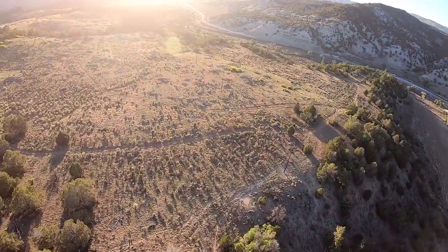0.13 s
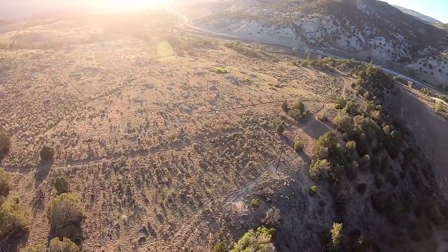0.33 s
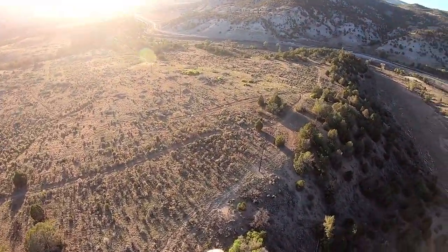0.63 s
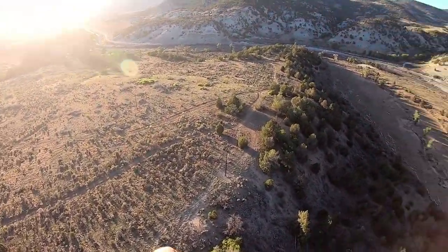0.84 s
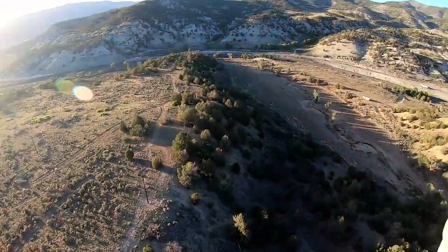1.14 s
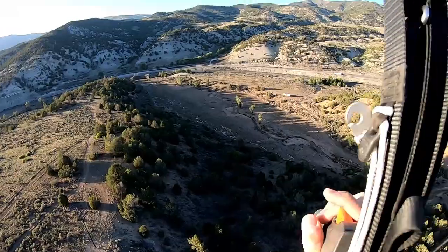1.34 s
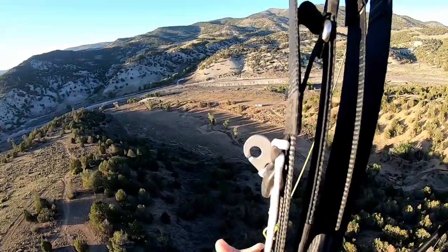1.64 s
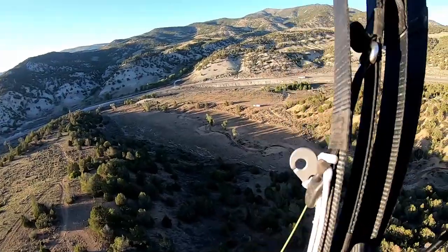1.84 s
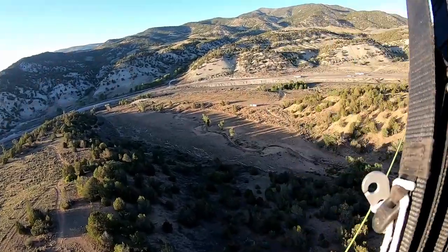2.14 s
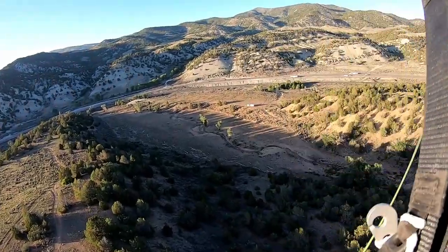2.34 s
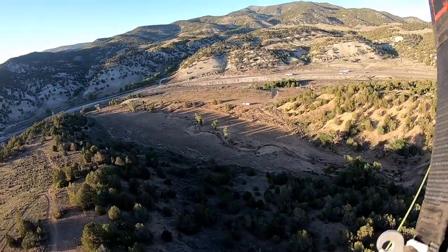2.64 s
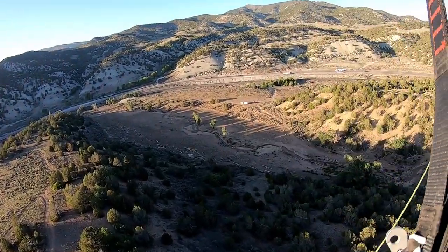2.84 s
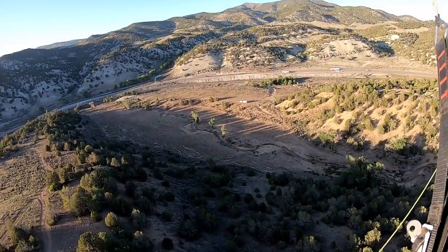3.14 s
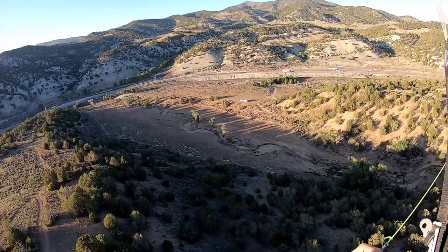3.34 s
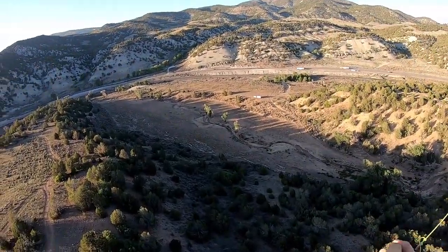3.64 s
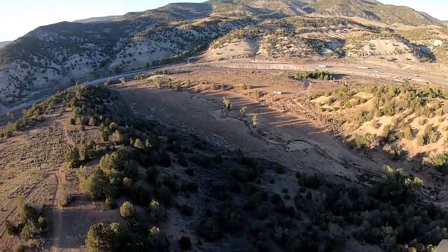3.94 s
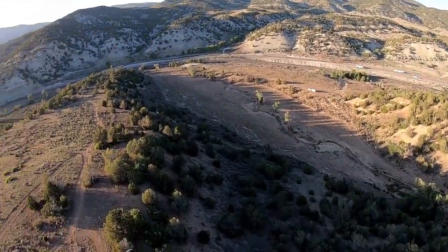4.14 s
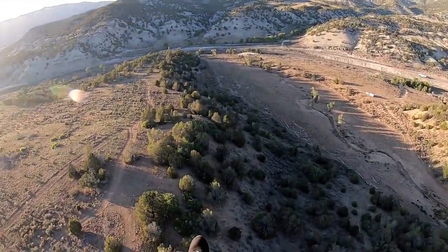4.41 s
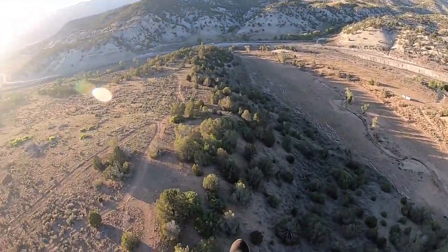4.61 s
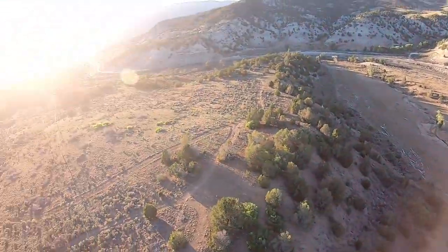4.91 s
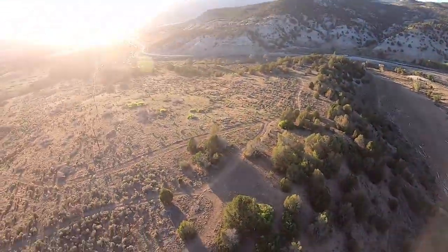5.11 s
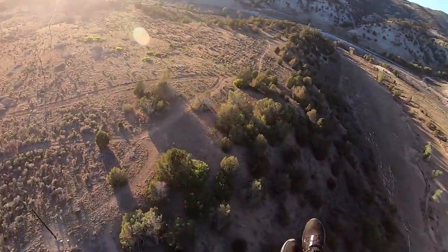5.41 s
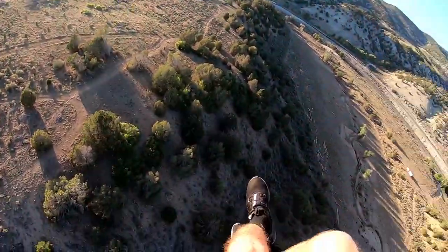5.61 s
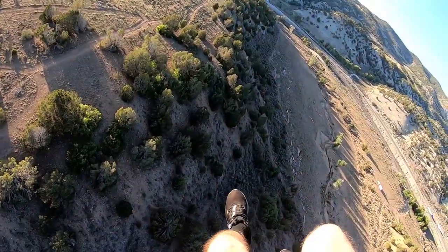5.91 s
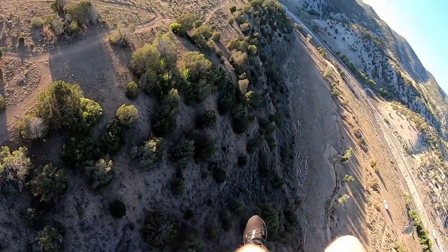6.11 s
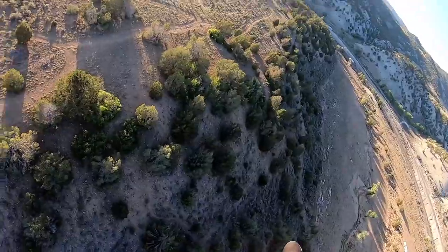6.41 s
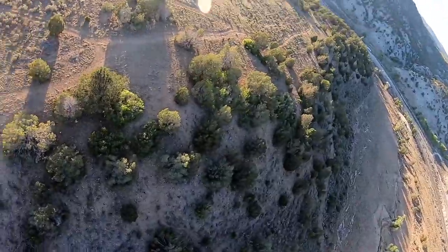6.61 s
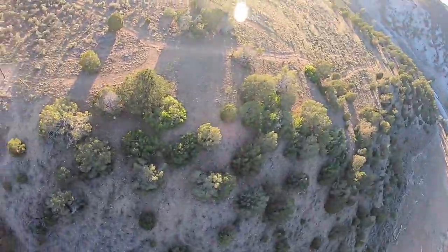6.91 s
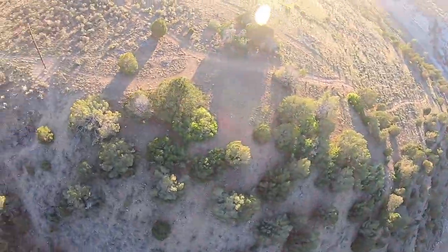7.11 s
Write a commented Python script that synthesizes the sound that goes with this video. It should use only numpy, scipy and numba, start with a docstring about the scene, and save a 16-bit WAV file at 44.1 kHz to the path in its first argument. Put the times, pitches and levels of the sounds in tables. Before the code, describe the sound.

A small two-stroke propeller engine drops from high revs to a popping idle, climbs, sinks and rises again amid rushing wind.

```python
"""A belt-driven two-blade propeller and its backpack two-stroke, heard from a helmet camera in flight.
High revs fall to an idle in the first three seconds, with stray pops, and harness ticks until the revs recover.
The note climbs, sinks again before six and a half seconds, then rises as a faint whistle swells and fades.
Throughout, harmonic exhaust and blade tones beat, filtered noise makes prop wash and wind, and noise bursts
ring the loose cage; the rush follows the revs while its treble comes and goes."""
import sys
import numpy as np
from scipy import signal
from scipy.fft import rfft, irfft
from scipy.io import wavfile
from scipy.ndimage import uniform_filter1d
from numba import njit

SR = 44100
rng = np.random.default_rng(int(sys.argv[2]) if len(sys.argv) > 2 else 0)


def pcm_store(signal):
    """Save signal as 16-bit PCM."""
    levels = np.round(np.clip(np.atleast_2d(signal), -1, 1) * 32767)
    wavfile.write(sys.argv[1], SR, levels.astype(np.int16).T)


N = 319857


def undb(db):
    """Logarithmic level: decibels to amplitude gain."""
    return 10 ** (np.asarray(db) / 20)


def curves(table):
    """Linear interpolation: each column of a table, one value a sample."""
    s, *columns = np.transpose(table)
    return [np.interp(np.arange(N) / SR, s, c) for c in columns]


def unit(x):
    """Normalisation to an rms of 1."""
    return x / np.sqrt(np.mean(x ** 2))


@njit
def svf(x, hz, width):
    """Resonance: a state-variable band-pass with gain 1 at the centre."""
    y, band, low = np.empty(len(x)), 0., 0.
    g, k = np.tan(np.pi * hz / SR), width / hz
    for i in range(len(x)):
        v = (band + g * (x[i] - low)) / (1 + g * (g + k))
        band, low, y[i] = 2 * v - band, low + 2 * g * v, k * v
    return y


def ring(x, modes):
    """Modal superposition: a sum of resonances with alternating sign."""
    out = 0
    for i, (hz, width, db) in enumerate(modes):
        out = out + (-1) ** i * undb(db) * svf(x, 1. * hz, 1. * width)
    return out


def dull(x, hz):
    """High-frequency attenuation: a steep low-pass."""
    return signal.sosfilt(signal.butter(4, hz, fs=SR, output="sos"), x)


def walk(rate):
    """Slow random fluctuation: levels held 1 / rate s, slewed twice, spread 1."""
    k = int(SR / rate)
    held = np.repeat(rng.standard_normal(N // k + 1), k)
    slewed = uniform_filter1d(uniform_filter1d(held, k), k)
    return unit(slewed[:N])


def strikes(table):
    """Impulsive excitation: one impulse for each (s, dB) row."""
    s, db = np.transpose(table)
    x = np.zeros(N)
    x[(s * SR).astype(int)] = undb(db)
    return x


def burst(x, t60_s):
    """Exponential decay: each impulse starts a short fading noise."""
    decay = np.exp(-np.log(1000) * np.arange(int(t60_s * SR)) / (t60_s * SR))
    return np.convolve(x, decay)[:N] * rng.standard_normal(N)


def whole_cycles(phase):
    """Phase counting: 1 at each sample that completes a cycle, 0 elsewhere."""
    return np.diff(np.floor(phase), prepend=0)


def pulling(hz):
    """Rate of change of revs: how hard they climb (up to 1) or fall (down to -1)."""
    hz_per_s = uniform_filter1d(np.gradient(hz) * SR, SR // 4)
    return np.tanh(hz_per_s / 38)


# Levels that follow the revs: firing rate f/Hz, blade overtones below the ninth level/dB, from the ninth level/dB,
# rush around 1.2 kHz level/dB, around 4 kHz level/dB, around 7.5 kHz level/dB
LEVELS_BY_REVS = [(44.5, -31, -48.5, -33.5, -41.5, -58), (52.2, -35.5, -33, -32, -39.5, -58),
                  (63.39, -35.5, -36, -25.5, -36.5, -54.5), (85.6, -30.5, -29, -20.5, -32, -49),
                  (94.6, -38.5, -40, -17, -30, -45.5), (106.8, -31.5, -19, -18.5, -31, -54)]
PULL_DB = 1.5  # louder while the revs climb, softer while they fall


def by_revs(hz):
    """Speed-dependent source strength: levels against log firing rate, raised while the engine pulls."""
    rate, *columns = np.transpose(LEVELS_BY_REVS)
    return [np.interp(np.log(hz), np.log(rate), c) + PULL_DB * pulling(hz) for c in columns]


# Eddies at the microphone: t/s, rumble level/dB, buffet level/dB
WIND_LEVELS = [(0.0, -29, -22.5), (0.6, -34, -21.5), (0.95, -37, -15.5), (1.25, -33, -19.5),
               (1.6, -33, -17.5), (2.2, -23, -19), (2.6, -24, -21.5), (2.9, -27, -21.5), (3.3, -30, -23.5),
               (3.75, -28, -21), (4.14, -18, -21.5), (4.7, -27, -23), (5.0, -28, -22.5),
               (5.25, -21.5, -20.5), (5.7, -24, -21.5), (6.1, -19.5, -20), (6.5, -22, -19),
               (6.9, -23, -20.5), (7.25, -20, -19.5)]


def wind():
    """Turbulent pressure: eddies on the microphone port give a deep rumble and a lumpy buffet above it."""
    rumble_db, buffet_db = curves(WIND_LEVELS)
    rumble = svf(svf(svf(rng.standard_normal(N), 60., 77.0), 60., 81.0), 60., 100.0)
    buffet = dull(svf(svf(rng.standard_normal(N), 157.5, 97.0), 186.0, 600.0), 830.0)
    rumble = unit(rumble) * undb(rumble_db + .8 * walk(2.6))
    buffet = unit(buffet) * undb(buffet_db + .4 * walk(17))
    return rumble + buffet


WHISTLE_S, WHISTLE_HALF_S = 6.81, 0.26  # centre, and time from there to 1/e
WHISTLE_HZ, WHISTLE_WIDTH_HZ, WHISTLE_DB = 2046., 111.6, -44


def whistle():
    """Narrow-band flow noise: a breathy band swells in the airflow and fades."""
    swell = np.exp(-((np.arange(N) / SR - WHISTLE_S) / WHISTLE_HALF_S) ** 2)
    breath = unit(svf(rng.standard_normal(N), WHISTLE_HZ, WHISTLE_WIDTH_HZ))
    return undb(WHISTLE_DB) * swell * breath


# Rush relative to the law of the revs: t/s, around 1.2 kHz level/dB, around 4 kHz level/dB
RUSH_OFFSETS = [(0, -1.5, 1.5), (.6, -1.5, -0.5), (1.1, 1.2, 2), (2.0, 2.7, -1.5), (2.8, -2.5, -5.5),
                (3.1, -1, -1.5), (3.7, 2, 3), (4.35, 0.5, 2.5), (4.75, -1.5, -1.5), (5.05, 0, 1),
                (5.55, -3, 1), (5.8, 1, -1.5), (6.1, 3, -2.5), (6.5, 6, -4), (6.9, 1.5, -1.2),
                (7.25, -0.5, 4.5)]
# Treble of the rush: t/s, around 7.5 kHz level/dB relative to the law of the revs, around 12 kHz level/dB
TREBLE_LEVELS = [(0, 2, -60), (.3, -0.5, -59.5), (.8, -3, -66), (1.0, -3, -70), (1.52, -1, -56.5),
                 (1.9, 2, -60), (2.2, 1, -71), (2.8, 1, -80), (3.2, 3, -70), (3.55, 6, -59),
                 (3.95, -1, -61), (4.45, 1.5, -66), (4.8, -3.5, -66), (5.1, 3, -65), (5.6, -1.5, -71),
                 (6.0, -2.5, -66), (6.5, 2, -71), (6.85, 3, -62), (7.25, -1, -61)]
# Relative spectral density of the rush: f/Hz, level/dB
RUSH_SPECTRUM = [(200, -28), (330, -21.5), (480, -8), (750, -6), (1160, -9), (1700, -12), (2330, -16.5),
                 (3370, -21.5), (4900, -30), (5700, -35), (6400, -40), (7400, -41), (8500, -47),
                 (10800, -47.5), (13000, -62.5), (15000, -71)]
# Reference levels of that spectrum around 1.2, 4, 7.5 and 12 kHz: level/dB
RUSH_REFERENCE_DB = (-24, -36, -53, -62)
# Brief swells of the rush: t/s, level/dB at the peak, time from there to 1/e of the dB rise t/s
RUSH_SWELLS = [(0.87, 4.5, 0.028), (4.538, 1.5, 0.019), (5.533, 3.5, 0.053)]


def rush(crank, blade, low_revs, revs_db):
    """Amplitude-modulated broadband noise: prop wash chopped as each blade passes three struts on its way."""
    body_db, bright_db = curves(RUSH_OFFSETS)
    treble_db, top_db = curves(TREBLE_LEVELS)
    levels_db = [revs_db[0] + body_db, revs_db[1] + bright_db, revs_db[2] + treble_db, top_db]
    gust = walk(17)
    # both blade swells come and go with the gusts; at lower revs each firing adds a puff of gas
    struts, passes, puffs = (undb(3 * walk(2.5)) for _ in range(3))
    chop = 1 + .14 * struts * np.cos(6 * np.pi * blade)
    chop += .09 * passes * np.cos(2 * np.pi * blade)
    chop += .13 * puffs * low_revs * np.cos(2 * np.pi * crank)
    f = np.fft.rfftfreq(N, 1 / SR) + 1
    colour_hz, colour_db = np.transpose(RUSH_SPECTRUM)
    colour = undb(np.interp(np.log(f), np.log(colour_hz), colour_db))
    noise = rfft(rng.standard_normal(N) * chop) * colour
    middle = irfft(noise * (f > 500) * (f < 2500), N)
    noise = noise * undb(RUSH_REFERENCE_DB[0]) / np.std(middle)
    swell_db = sum(db * np.exp(-((np.arange(N) / SR - s) / half_s) ** 2) for s, db, half_s in RUSH_SWELLS)
    anchors = np.log([1500, 4000, 7500, 12000])
    out = 0
    # overlapping third-octave bands, each levelled between its nearest anchors
    for hz in 1500 * 2 ** (np.arange(-9, 12) / 3):
        band = irfft(noise * np.clip(1 - abs(3 * np.log2(f / hz)), 0, 1), N)
        share = [np.interp(np.log(hz), anchors, row) for row in np.eye(len(anchors))]
        band_db = sum(s * (db - usual) for s, db, usual in zip(share, levels_db, RUSH_REFERENCE_DB))
        out = out + band * undb(band_db + swell_db + 0.14 * gust + 1.0 * walk(20))
    return out


# Rattle of the cage: t/s, level/dB
RATTLE_LEVELS = [(0, -69), (1.1, -65), (1.55, -61), (2.0, -60), (3.2, -66), (3.5, -59), (3.9, -64),
                 (4.3, -69), (6.5, -71), (6.9, -68), (7.25, -68)]
# Loose parts of the cage, excited twice in series: f/Hz, width f/Hz, relative level/dB for each pass
CAGE_MODES = [(7500, 1700, 0.5), (10300, 1200, -1), (12200, 1200, -4.5)]
RATTLE_T60_S, RATTLE_SCATTER_DB = .012, 4
SHAKE_DB = 4.5  # the firing that meets the heavy side of the propeller shakes harder


def rattle(crank, blade):
    """Forced vibration with imbalance: each firing jolts the cage into a short bright rattle."""
    fired = whole_cycles(crank) > 0
    scatter_db = RATTLE_SCATTER_DB * rng.standard_normal(fired.sum())
    jolts = np.zeros(N)
    jolts[fired] = undb(scatter_db + SHAKE_DB * np.cos(np.pi * blade[fired]))
    shaken = burst(jolts, RATTLE_T60_S)
    return undb(curves(RATTLE_LEVELS)[0]) * unit(ring(ring(shaken, CAGE_MODES), CAGE_MODES))


# Separate harness ticks: t/s, relative strike level/dB
TICK_STRIKES = [(1.1724, -30), (1.4394, -32), (1.4904, -27), (1.5877, -34), (1.686, -38), (1.7823, -36),
                (1.8536, -36), (1.916, -29), (2.0098, -31), (2.0906, -32), (2.1345, -32), (2.1776, -25),
                (2.2184, -30), (2.2412, -27), (2.3026, -31), (2.3241, -34), (2.3864, -27.5), (2.4268, -35),
                (2.8124, -39), (2.9631, -28), (3.0101, -31), (3.0774, -30), (3.1217, -38), (3.1577, -33),
                (3.205, -33), (3.245, -33), (3.3719, -34)]
# Resonances of buckles and rings: f/Hz, width f/Hz, relative level/dB
BUCKLE_MODES = [(2400, 1200, 5.5), (3600, 1300, 11), (5400, 720, 4.5), (7100, 880, -2.5),
                (10380, 1300, -11)]
SLACK_START_S, SLACK_END_S, SLACK_FADE_S = 1.15, 3.36, 0.4  # each fade is centred on its time
TAUT_DB, SLACK_DB = -58, -43  # chatter that drives the buckles


def ticks(blade):
    """Impact excitation of metal modes: harness ticks, and chatter with each blade pass on slack straps."""
    passes = whole_cycles(blade) > 0
    chatter = np.zeros(N)
    chatter[passes] = undb(2.5 * rng.standard_normal(passes.sum()))
    t = np.arange(N) / SR
    inside_s = np.minimum(t - SLACK_START_S, SLACK_END_S - t)
    slack = np.clip(inside_s / SLACK_FADE_S + .5, 0, 1)
    struck = undb(-1.0) * burst(strikes(TICK_STRIKES), 0.022)
    chattering = undb(TAUT_DB + (SLACK_DB - TAUT_DB) * slack) * unit(burst(chatter, 0.23))
    return dull(svf(ring(struck + chattering, BUCKLE_MODES), 4700.0, 9000.), 12000.)


# Stray firings: t/s, relative thump level/dB, crack level/dB and snap level/dB over the thump,
# delay of the crack and snap after the thump t/s
POP_STRIKES = [(1.652, -26, 5, -6, 0.015), (2.208, -28, 6, -6, -0.0013), (2.312, -10.5, -12, -22, -0.0037),
               (2.4836, -9, 1, -5, -0.0017), (2.5471, -12, 2.5, 3, 0.0022), (2.586, -30, 5, -6, .001),
               (2.608, -23, 2, -8, 0.0062), (2.6336, -10.5, 1.5, -13, -0.00017),
               (2.697, -18.5, -3, -16, .002), (2.737, -18.5, -2, -10, -0.0052)]


def pops():
    """Impulse response of the pipe: stray firings off throttle thump, and crack with a bright snap."""
    s, thump_db, crack_db, snap_db, lag_s = np.transpose(POP_STRIKES)
    thump = strikes(np.c_[s, thump_db])
    thump = dull(svf(svf(thump, 184.0, 175.0), 360.0, 680.0), 1100.0)
    crack, snap = (strikes(np.c_[s + lag_s, thump_db + db]) for db in (crack_db, snap_db))
    # each impulse carries a faint noisy tail
    crack, snap = (x + undb(-18) * burst(x, 0.015) for x in (crack, snap))
    crack = svf(svf(crack, 770.0, 850.0), 840.0, 1300.0)
    snap = svf(svf(snap, 1500.0, 1600.), 2000., 2500.)
    return dull(undb(27.5) * crack + undb(14) * snap - undb(45.0) * thump, 3000)


# Overtones of the blade passes: overtone number, relative level/dB
BLADE_OVERTONES = [(1, 1), (2, -4.5), (4, 3), (5, -12.5), (6, 6.5), (7, -0.5), (8, -3), (9, -3), (10, -2.5),
                   (12, -5.5), (13, -1), (15, -12.5), (16, -15.5)]
COAST_DB = 6  # blade overtones up to the fourth swell while the revs fall


def propeller(blade, low_db, high_db, coast):
    """Harmonics of the blade-pass frequency, each wavering in the gusty inflow."""
    out = 0
    for k, db in BLADE_OVERTONES:
        level_db = db + (low_db if k < 9 else high_db) + COAST_DB * coast * (k < 5) + 1.3 * walk(7)
        phase = k * 2 * np.pi * blade + 2 * np.pi * rng.random() + 0.26 * walk(6)
        out = out + undb(level_db) * np.sin(phase)
    return out


# Exhaust levels: t/s, second overtone with its blade partner level/dB, first level/dB, third level/dB,
# fourth level/dB, fifth level/dB, added to the higher ones level/dB
ENGINE_LEVELS = [(0.0, -10, -31, -47, -30.5, -39, 0), (0.25, -9.5, -36, -42, -29.5, -38, 4),
                 (0.5, -9, -39.5, -32, -36, -42, -4), (0.9, -13, -27, -34, -38, -34, -2),
                 (1.1, -17.5, -35, -27, -28, -39, -4), (1.25, -22.5, -25, -21, -33, -47, 1),
                 (1.5, -20, -27, -18.5, -30, -36, 2.5), (1.8, -22.5, -34, -30, -29, -34.5, -2),
                 (2.1, -18.5, -33, -33, -33, -32, -0.5), (2.4, -26, -39, -37, -37, -39, -10),
                 (2.7, -25, -41, -29, -32, -36, -2.5), (3.0, -30.5, -44, -40, -27, -22, 1),
                 (3.25, -24, -39, -36, -23.5, -25, 0), (3.45, -20.5, -29, -22.5, -22.5, -42, 1.5),
                 (3.7, -18, -28, -18, -28, -27.5, 1.5), (3.95, -18, -24, -19.5, -42, -34, -2),
                 (4.2, -14.5, -32, -21, -35, -31, -20), (4.45, -19, -25, -17.5, -29.5, -40, 1),
                 (4.8, -7.5, -31.5, -17, -25.5, -38, 6), (5.1, -15, -25.5, -23, -27.5, -40, -2),
                 (5.4, -21, -32, -20.5, -26.5, -45, -4), (5.7, -21, -40, -34, -37, -26, -1.5),
                 (6.0, -23, -40, -31, -21.5, -35, -3), (6.25, -23, -37, -39, -26.5, -29.5, -5),
                 (6.5, -21, -38, -27, -32, -25, -3), (6.75, -18, -32, -37, -31, -33, -4),
                 (7.0, -17.5, -35, -21, -31, -36, -1.5), (7.25, -14, -28, -20.5, -30, -23.5, 3)]
# Pipe colour for overtones from the sixth up: f/Hz, level/dB
PIPE_COLOUR = [(260, -37), (330, -36), (430, -38.5), (600, -41.5), (900, -41)]
# Sixth to eleventh overtone relative to the pipe: level/dB
UPPER_OFFSETS_DB = (-3.5, 3.5, -6, -3.5, -4.5, -2.5)
# Multiples of the firing rate: overtone number
EXHAUST_OVERTONES = (1, 2, 3, 4, 5, 6, 7, 8, 9, 10, 11)
RASP_DB = 8  # overtones from the eighth up gain this much while the engine pulls, lose it while it coasts


def overtones_db(hz):
    """Source and filter: five low overtones carry the note; the pipe colours the wavering higher ones."""
    second_db, first_db, *next_db, upper_db = curves(ENGINE_LEVELS)
    pipe_hz, pipe_db = np.transpose(PIPE_COLOUR)
    upper = []
    for k, db in zip(EXHAUST_OVERTONES[5:], UPPER_OFFSETS_DB):
        coloured_db = np.interp(np.log(k * hz), np.log(pipe_hz), pipe_db) + db + upper_db
        upper.append(coloured_db + RASP_DB * pulling(hz) * (k > 7) + 1.6 * walk(2.8))
    return [first_db, second_db] + next_db + upper


# Silencer resonances, passed twice in series: f/Hz, width f/Hz, relative level/dB for each pass
SILENCER_MODES = [(640, 70, -5), (920, 70, 0)]
# Ringing of the silencer: t/s, level/dB
SILENCER_LEVELS = [(0, -32), (.55, -30), (1, -41), (2, -36), (2.8, -34), (3.2, -35), (3.4, -31), (3.7, -32),
                   (4.4, -36.5), (5.3, -41.5), (6.5, -40), (7.25, -38)]
SCATTER_DB, SCATTER_TURNS = 1.73, 0.014013  # strength and timing, from firing to firing
SKIP_DB, SKIP_BELOW_HZ = 12, 58  # at low revs, unless the engine pulls, every second firing is weaker
GAS_DB = -35.5  # steady gas flow beside the pulses


def exhaust(hz, crank, beat, throbs):
    """Harmonic series of the firings, uneven from turn to turn; the pulses also ring the silencer."""
    tones_db = overtones_db(hz)
    chance = rng.standard_normal((2, 1000))
    strong_db, late_turns = (spread * np.interp(crank, np.arange(1000), c)
                             for spread, c in zip((SCATTER_DB, SCATTER_TURNS), chance))
    turn = 2 * np.pi * (crank + late_turns)
    tones = [np.sqrt(2) * undb(db + strong_db) * np.sin(k * turn + k * k)
             for k, db in zip(EXHAUST_OVERTONES, tones_db)]
    # the third blade overtone lies a few hertz above the weaker second exhaust overtone and beats with it
    # the pair lingers in step and hurries through opposition, so the dips are short
    second = undb(strong_db) * np.sin(2 * turn - 0.63 * np.sin(2 * np.pi * throbs))
    third_blade = np.sin(2 * np.pi * (2 * crank + throbs))
    tones[1] = np.sqrt(2) * undb(tones_db[1]) * (beat * second - third_blade) / (1 + beat)
    every_second = np.floor(crank) % 2
    skip = every_second * np.clip(1.6 - 3 * pulling(hz), 0, 1) * (hz < SKIP_BELOW_HZ)
    pulses = whole_cycles(crank) * undb(strong_db - SKIP_DB * skip)
    flow = pulses + undb(GAS_DB) * rng.standard_normal(N)
    ringing = unit(ring(ring(flow, SILENCER_MODES), SILENCER_MODES))
    return sum(tones) + undb(curves(SILENCER_LEVELS)[0]) * ringing


# Moments of opposition between the third blade and second exhaust overtones, uneven as the belt slips:
# t/s, strength of the exhaust tone against the blade tone (0-1)
THROB_MARKS = [(-.06, .8), (0.159, 1), (.40, 0.5), (.61, 0.23), (.86, 0.4), (1.02, 0), (1.41, 0.28),
               (3.13, 0.05), (3.55, 0.6), (3.85, 1), (4.15, 0.58), (4.51, 0.62), (4.81, 0.71), (5.07, 0.84),
               (5.27, 0.19), (5.93, 0.23), (6.97, 0.26), (7.3, 0.31)]
# Belt slip: firing rate f/Hz, turns for one throb
SLIP_TURNS = [(46, 11), (54, 20)]


def belt_slip(hz):
    """Beating by slip: throbs counted through the marks, at a pace between them that follows the revs."""
    slip = np.cumsum(hz / np.interp(hz, *np.transpose(SLIP_TURNS))) / SR
    pace = hz / SLIP_TURNS[-1][1]
    # extend the slip beyond both ends, for marks that lie outside
    times = np.r_[-1, np.arange(N) / SR, 9]
    extended = np.r_[-pace[0], slip, slip[-1] + pace[-1] * (9 - N / SR)]
    marks = np.interp(np.array(THROB_MARKS)[:, 0], times, extended)
    # a whole number of throbs, at least one, fits between neighbouring marks
    counts = np.maximum(np.round(np.diff(marks)), 1)
    return np.interp(slip, marks, np.cumsum(np.r_[0, counts]))


# Engine speed: t/s, firing rate f/Hz
FIRING_RATE = [(0.0, 105.5), (0.18, 103.8), (0.4, 100), (0.58, 96.25), (0.75, 87.64), (0.9, 84.01),
               (1.05, 79.2), (1.2, 74.13), (1.4, 68.57), (1.64, 60), (1.8, 55.86), (1.96, 50.67),
               (2.15, 48.37), (2.38, 45.97), (2.48, 48.85), (2.69, 44.64), (2.9, 43.9), (3.05, 43.34),
               (3.2, 42.72), (3.35, 47.86), (3.59, 55.44), (3.8, 59.75), (4.05, 65.73), (4.26, 70.67),
               (4.5, 82.76), (4.78, 85.13), (5.15, 82.46), (5.35, 75.04), (5.55, 65.52), (5.75, 55.18),
               (5.95, 51.77), (6.15, 48.24), (6.35, 45), (6.52, 43.2), (6.7, 48.24), (6.9, 55),
               (7.25, 66.7)]


def scene():
    """Superposition: crank and belt set the two clocks, and all sources add at one microphone."""
    hz = curves(FIRING_RATE)[0]
    crank = np.cumsum(hz) / SR
    throbs = belt_slip(hz)
    blade = (2 * crank + throbs) / 3  # blade passes so far
    beat = np.clip(curves(THROB_MARKS)[0], 0, 1)
    low_db, high_db, *rush_db = by_revs(hz)
    coast = np.maximum(-pulling(hz), 0)
    low_revs = np.clip(1.6 - hz / 60, 0, 1)
    air = wind() + whistle() + rush(crank, blade, low_revs, rush_db)
    loose = rattle(crank, blade) + ticks(blade)
    engine = pops() + propeller(blade, low_db, high_db, coast) + exhaust(hz, crank, beat, throbs)
    return (air + loose + engine)[None]


def record(dry):
    """Saturation and band limiting: the camera rounds the loudest peaks and cuts the top above 15.5 kHz."""
    rounded = np.tanh(0.88 * dry) / 0.9
    return signal.sosfilt(signal.ellip(8, .2, 70, 15500, fs=SR, output="sos"), rounded)


dry = scene()
out = record(dry)
pcm_store(out)
```